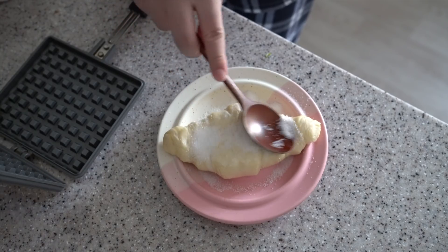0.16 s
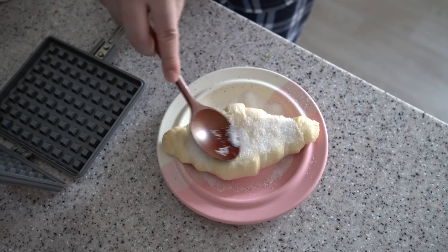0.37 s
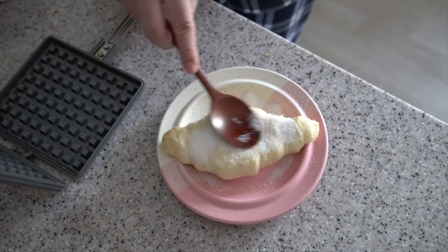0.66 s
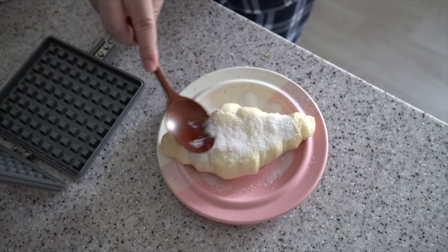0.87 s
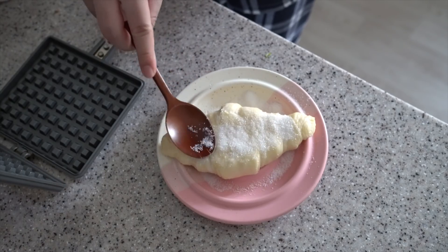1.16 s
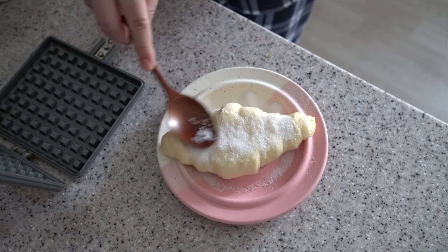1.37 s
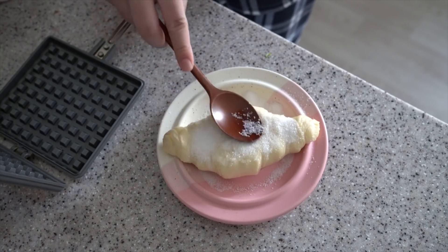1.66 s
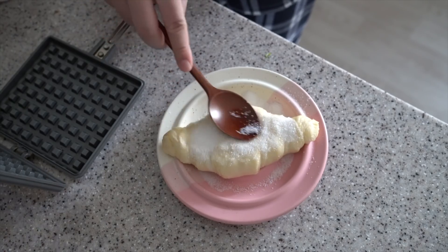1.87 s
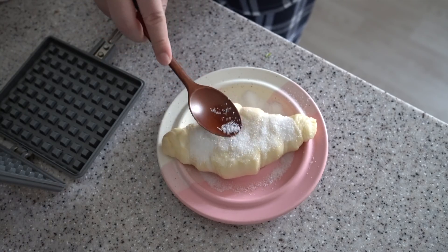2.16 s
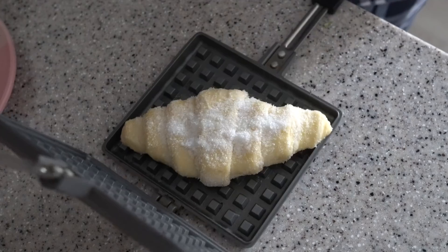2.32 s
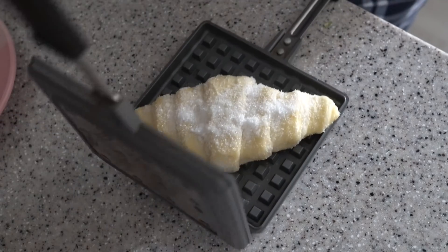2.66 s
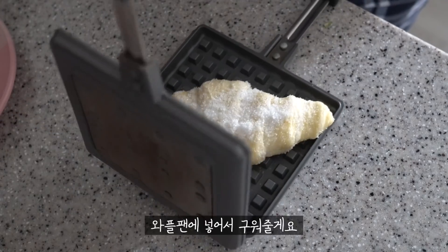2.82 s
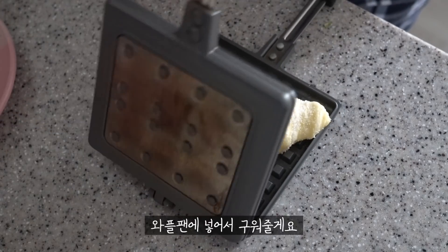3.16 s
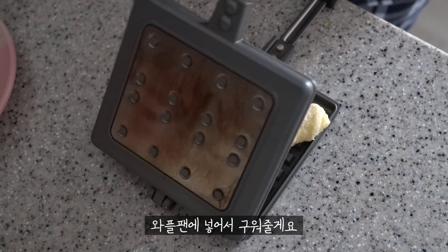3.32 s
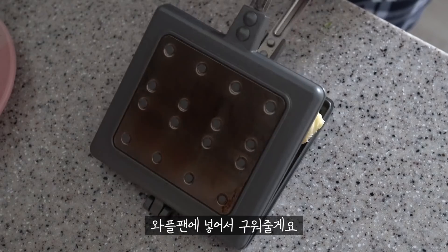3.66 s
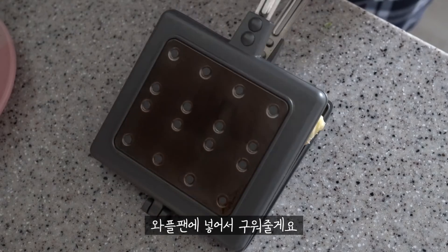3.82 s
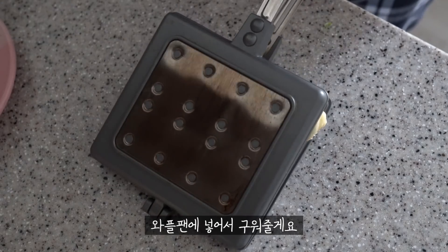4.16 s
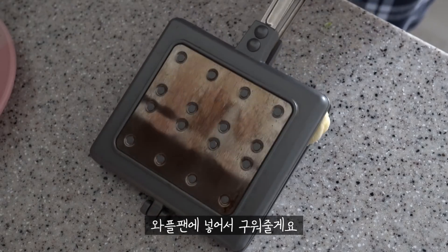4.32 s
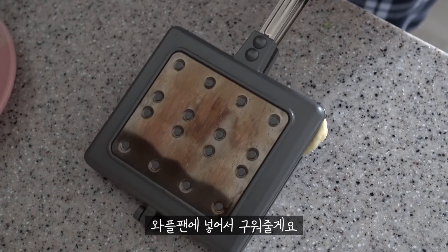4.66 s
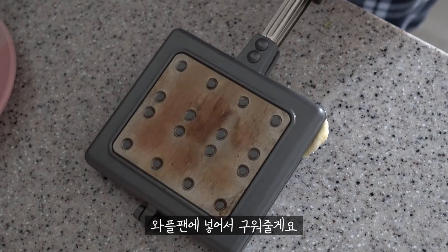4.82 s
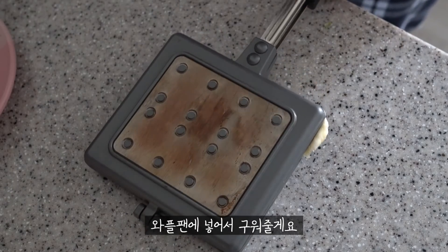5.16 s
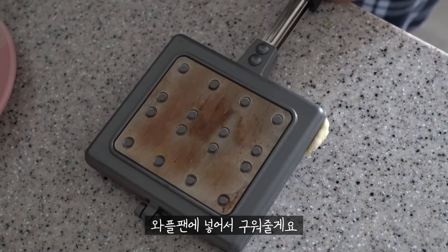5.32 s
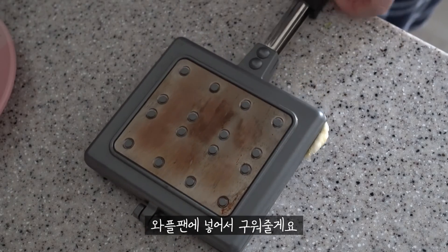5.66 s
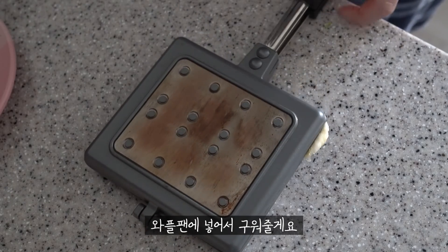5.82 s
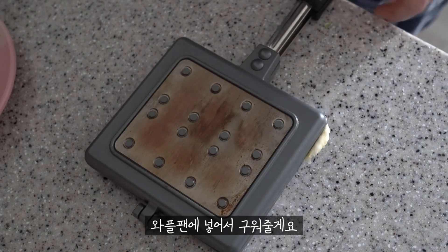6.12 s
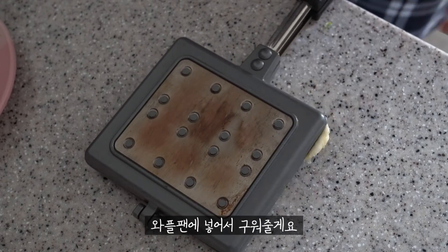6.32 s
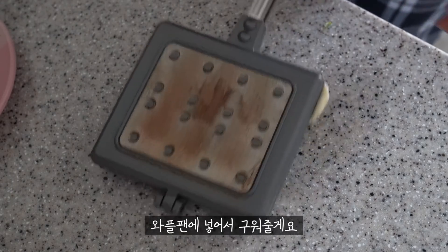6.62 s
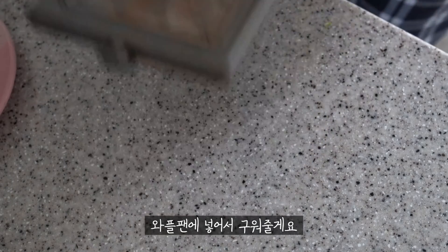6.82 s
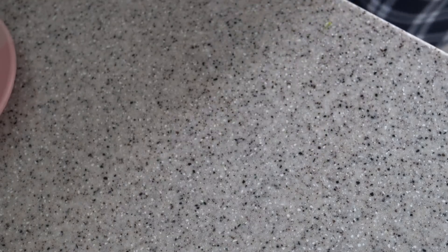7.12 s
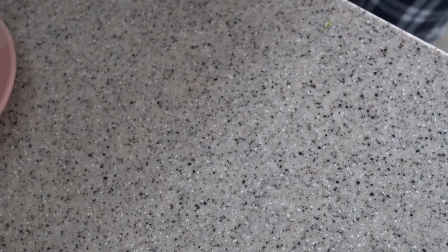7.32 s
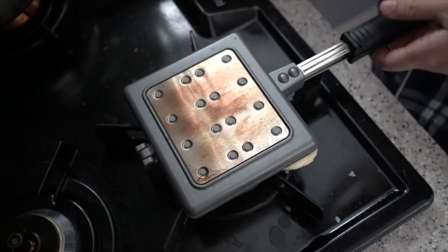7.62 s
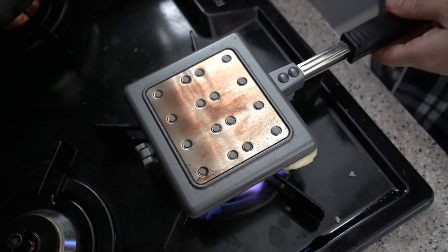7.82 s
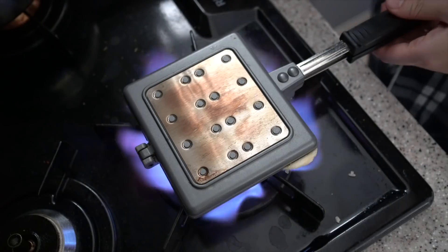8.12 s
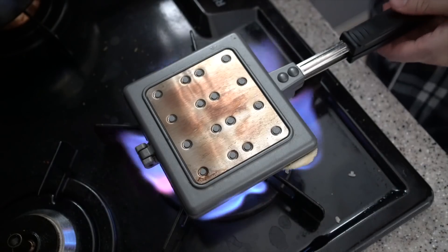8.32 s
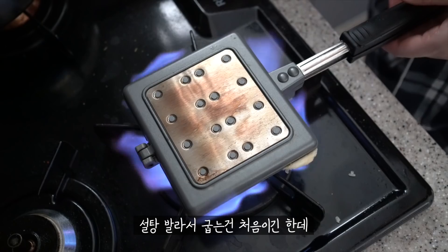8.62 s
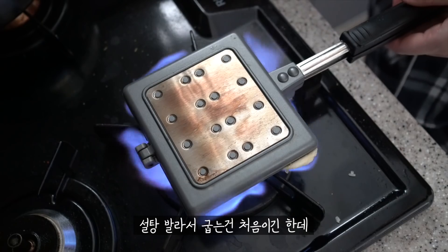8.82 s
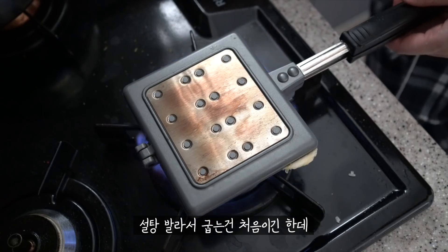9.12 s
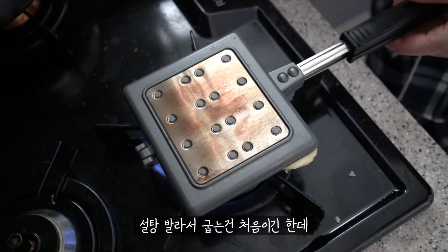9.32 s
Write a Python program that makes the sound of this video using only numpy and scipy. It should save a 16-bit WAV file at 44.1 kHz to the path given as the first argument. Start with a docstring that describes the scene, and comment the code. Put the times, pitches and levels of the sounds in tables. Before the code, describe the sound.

A close microphone in a quiet home kitchen with low room air and a short echo. From 0 to 2.3 s a wooden spoon drags sugar over pastry in crisp, grainy strokes, the longest near 0.2-0.5 and 0.65-0.9, with small soft pats between. At 2.37 a loud metal pan knock and thump, more clacks by 2.5, then dull chafing and a small squeak around 3.1. Rubbing continues from 3.6; light contacts at 4.5, a hard bright clack at 4.86, a cluster of latch clicks at 5.2-5.4, and a ringing clunk with a heavy thump at 5.6-5.7. Around 6.4-6.7 the pan slides off with a faint squeal, then tiny squeaks. At 7.45-7.75 a stove knob clunks and gas starts hissing. From 7.87 sharp igniter snaps repeat about eight per second until roughly 9.5; flame puffs alight, flutters and roars low, fading sharply around 9.

```python
"""A hinged metal waffle pan is shut, latched and lifted off a stone counter: noisy pushes ring its modes.
Before that a wooden spoon spreads and pats sugar on a pastry, as filtered random grains.
Pan halves chafe as uneven slips, narrow noises squeak and ring, and the worktop thumps in damped sines.
Then a stove knob is pushed in, gas hisses as shaped noise, the flame catches in low puffs and roars,
and the igniter keeps sparking in sharp snaps. Walls echo the spoon, pan, knob and sparks."""
import sys
import numpy as np
from scipy import signal
from scipy.io import wavfile
from scipy.ndimage import uniform_filter1d

SR = 44100
rng = np.random.default_rng(int(sys.argv[2]) if len(sys.argv) > 2 else 0)


def master_out(mix):
    """Clip the mix to full scale and print it as 16-bit PCM to the path in sys.argv[1]."""
    frames = np.transpose(np.atleast_2d(mix))
    ceiling = np.clip(frames, -1, 1)
    pcm = np.round(ceiling * 32767).astype(np.int16)
    wavfile.write(sys.argv[1], SR, pcm)


N = 418068


def gain_of(db):
    """Decibels to an amplitude factor."""
    return 10 ** (np.asarray(db) / 20)


def evened(x):
    """Scales to rms 1."""
    return x / np.sqrt(np.mean(x ** 2) + 1e-20)


def read(points, hz):
    """Reads a table on a log-frequency axis."""
    point_hz, value = np.transpose(points)
    return np.interp(np.log(hz + 1), np.log(point_hz + 1), value)


def add(mix, start_s, sound):
    """Mixes a sound in at start_s, cut at the end of the mix."""
    part = mix[round(start_s * SR):][:len(sound)]
    part += sound[:len(part)]


def coloured(x, points, size=2048):
    """Causal minimum-phase filter with the given spectrum."""
    gain_db = np.maximum(read(points, abs(np.fft.fftfreq(size, 1 / SR))), -90)
    log_gain = np.log(gain_of(gain_db))
    phase = -signal.hilbert(log_gain).imag
    taps = np.fft.ifft(np.exp(log_gain + 1j * phase)).real
    return signal.oaconvolve(x, taps[:size // 2])[:len(x)]


def noise_of(points):
    """Steady noise of rms 1, filtered finely enough for low bands."""
    return evened(coloured(rng.standard_normal(N), points, size=8192))


def grains(per_s, spread_db):
    """Tiny random slips: many small, a few large."""
    size = gain_of(spread_db * np.minimum(rng.exponential(1, N), 5)) * rng.standard_normal(N)
    return evened(size * (rng.random(N) < per_s / SR))


def wobble(window_ms, rms_db):
    """Slow chance changes of level."""
    window = max(int(window_ms * SR / 1000), 2)
    return gain_of(rms_db * evened(uniform_filter1d(rng.standard_normal(N), window)))


def strokes(rows, edge):
    """Gain over the scene from strokes that swell, hold and fade; edge is the share spent on both ramps."""
    out = np.zeros(N)
    for row in rows:
        start_s, end_s, level_db = row[:3]
        shape = signal.windows.tukey(round((end_s - start_s) * SR), min(edge, 1))
        add(out, start_s, gain_of(level_db) * shape)
    return out


def murmurs(starts_s, db, hz, width_hz, envelopes):
    """Short noises, each narrowed twice around its own pitch."""
    out = np.zeros(N)
    for start_s, level_db, f, w, shape in zip(starts_s, db, hz, width_hz, envelopes):
        peak = signal.iirpeak(f, f / w, SR)
        noise = rng.standard_normal(2 * len(shape))
        narrow = signal.lfilter(*peak, signal.lfilter(*peak, noise))[len(shape):]  # filter already settled
        add(out, start_s, gain_of(level_db) * evened(narrow * shape) * np.sqrt(np.mean(shape ** 2)))
    return out


# Room air spectrum. Each row: frequency in Hz, relative level in dB.
AIR_SPECTRUM = [(12, -44), (20, 8), (42, 5.5), (113, -6.5), (157, 1), (208, -11), (363, -4.5), (441, -13.5),
                (651, -11), (1080, -13), (1420, -14), (8690, -27.5), (15600, -33.5)]
AIR_DB = -57
QUIETER_UNTIL_S, QUIETER_DB = 2.1, -3.5


def room_air():
    """Low-heavy noise drifts slowly; its level steps up once."""
    air = gain_of(AIR_DB) * noise_of(AIR_SPECTRUM) * wobble(89, 0.27)
    return air * gain_of(np.where(np.arange(N) < QUIETER_UNTIL_S * SR, QUIETER_DB, 0))


# Crushed sugar spectrum. Each row: frequency in Hz, relative level in dB.
SUGAR_SPECTRUM = [(250, -26), (700, -8), (1080, -22), (1500, -14), (2500, -9), (3500, -9.5), (4800, -7.5),
                  (6500, -6.5), (8600, -5.5), (10200, -15), (12000, -11.5), (15600, -16)]
# Spoon drags. Each row: start in seconds, end in seconds, level in dB, brightest band in Hz.
DRAGS = [(0.089, 0.187, -56.5, 6000), (0.172, 0.486, -39, 5200), (0.647, 0.897, -41.5, 6940),
         (0.876, 0.916, -51.5, 3830), (1.013, 1.066, -60, 5000), (1.277, 1.337, -57, 6500),
         (1.427, 1.496, -42, 7400), (1.476, 1.582, -55.5, 6000), (1.664, 1.701, -45, 8000),
         (1.744, 1.79, -58.5, 5970), (1.919, 2.004, -53.5, 6960), (2.054, 2.106, -60, 6000)]
# Spoon pats. Each row: start in seconds, level at onset in dB.
PATS = [(0.0987, -44), (0.6253, -43), (1.008, -46.5), (1.2167, -43), (1.8795, -39), (2.058, -44.5),
        (2.2509, -42)]
PAT_DECAY_S = 0.011
BRIGHT_DB, BRIGHT_WIDTH = -3.5, .45  # against the drag; share of the band's pitch


def sugar():
    """Crystals crush in a dense hiss under the drag and in a short burst under each pat."""
    t = np.arange(SR // 8) / SR
    force = strokes(DRAGS, 0.52)
    for start_s, db in PATS:
        add(force, start_s, gain_of(db) * np.exp(-t / PAT_DECAY_S))
    start_s, end_s, db, hz = np.transpose(DRAGS)
    swells = [np.hanning(round(SR * length_s)) for length_s in end_s - start_s]
    bright = murmurs(start_s, db + BRIGHT_DB, hz, BRIGHT_WIDTH * hz, swells)
    crush = evened(coloured(grains(16000, 0.29), SUGAR_SPECTRUM))
    return (force * crush + bright) * wobble(13, 1.0)


# Rubbing metal spectrum. Each row: frequency in Hz, relative level in dB.
RUB_SPECTRUM = [(150, -9), (300, -19.5), (650, -11), (950, -11.5), (2200, -12.5), (5000, -6), (8800, -8.5),
                (10500, -18.5), (15600, -25)]
# Pan halves chafing, hinge working, dough squeezed. Each row: start in seconds, end in seconds,
# level in dB and treble level in dB before the layer gains, loudest band in Hz, place of the middle 0-1.
CHAFES = [(2.27, 2.353, -32, -52, 1910, 0.43), (2.389, 2.477, -34, -62, 1100, 0.2),
          (2.497, 2.626, -37, -51, 1150, 0.14), (2.598, 3.021, -55.5, -84.5, 1000, 0.38),
          (3.56, 3.988, -47.5, -63.5, 1400, 0.54), (4.068, 4.115, -48, -66, 1200, 0.47),
          (4.126, 4.504, -44, -59.5, 1500, 0.45), (4.478, 5.114, -53, -62, 1360, 0.39),
          (5.18, 5.332, -37, -63, 1420, 0.33), (5.33, 5.464, -35.5, -50, 1100, 0.22),
          (5.481, 5.564, -42, -62, 504, 0.7), (5.532, 5.62, -30.5, -53, 935, 0.52),
          (5.705, 5.918, -52, -81, 1100, 0), (6.375, 6.675, -51, -67, 1000, 0.61),
          (6.727, 6.85, -59.5, -56.5, 1700, 0.48), (7.05, 7.5, -66, -59.5, 403, 0.66)]
SWELL_SHARE = .65  # of a stroke, rising and fading together
DULL_GAIN, BAND_GAIN = 0.45, 0.38


def chafing():
    """Dense uneven slips rub dully and loudest in one band; finer grit hisses above."""
    rub = coloured(grains(7000, 2.4) * wobble(11, 1.3), RUB_SPECTRUM)
    dull = evened(signal.lfilter(*signal.butter(4, 2100, fs=SR), rub))
    grit = evened(signal.lfilter(*signal.butter(2, 2500, "high", fs=SR), rub))
    start_s, end_s, db, treble_db, hz, middle = np.transpose(CHAFES)
    bend = np.log(.5) / np.log(np.clip(middle, .05, .95))  # moves the middle of each stroke
    shapes = []
    for length_s, power in zip(end_s - start_s, bend):
        place = np.linspace(0, 1, round(SR * length_s)) ** power
        shapes.append(np.clip(np.minimum(place, 1 - place) * 2 / SWELL_SHARE, 0, 1) ** 1.5)
    low, high = np.zeros((2, N))
    for at_s, low_db, high_db, shape in zip(start_s, db, treble_db, shapes):
        add(low, at_s, gain_of(low_db) * shape)
        add(high, at_s, gain_of(high_db) * shape)
    band = murmurs(start_s, db, hz, 1.0 * hz, shapes) * wobble(5.5, 3.9)
    return (DULL_GAIN * low * dull + high * grit + BAND_GAIN * band) * wobble(37, 1.1)


def tilt_db(hz, treble_db):
    """A softer contact loses more and more of the treble; a harder one moves less bass."""
    treble = (treble_db + 7.5) * np.clip(np.log(hz / 1800) / np.log(2.4), 0, 1.5)
    bass = 0.5 * (treble_db + 19.0) * np.clip(np.log(700 / hz), 0, 1)
    return treble - bass


# Broad contact crack spectrum. Each row: frequency in Hz, relative level in dB.
CRACK_SPECTRUM = [(80, -51.5), (170, -26.5), (320, -11.5), (700, 10.5), (1500, 5.5), (4000, 7), (8000, 3),
                  (11000, -8), (15500, -7.5)]
RATTLE_DB = -18  # loose parts against the blow
HARDER = 0.51  # dB of contact time lost per dB of treble
SCATTER_DB, DETUNE = 2.5, .015  # grip and spot vary each mode's strength and pitch


def blows(rows, modes, contact_s, crack_db, rattle_s):
    """A short noisy push and lumpy rattle crack and ring the modes, most and longest near the spot struck."""
    out, t = np.zeros(N), np.arange(SR // 6) / SR
    mode_hz, mode_db, t60_s = np.transpose(modes)[:, :, None]
    crack_hz, crack_shape_db = np.transpose(CRACK_SPECTRUM)
    draws = rng.standard_normal((len(rows), 3, len(t)))
    for (start_s, peak_db, treble_db, spot_hz), draw in zip(rows, draws):
        touch_s = contact_s * gain_of(min(-HARDER * (treble_db + 14), 1))
        lumps = gain_of(RATTLE_DB + 4 * evened(uniform_filter1d(draw[1], size=120)))
        fade = np.exp(-t / touch_s) + lumps * np.exp(-t / rattle_s)
        push = draw[0] * (1 - np.exp(-3 * t / touch_s)) * fade

        scatter, detune = draw[2, :2 * len(modes)].reshape(2, -1, 1)
        hz = mode_hz * (1 + DETUNE * detune)
        near = np.exp(-(np.log(hz / spot_hz) / .25) ** 2)
        ring_db = mode_db + 8 * near + SCATTER_DB * scatter + tilt_db(hz, treble_db)
        decay_db = -60 * t / (t60_s * (.5 + .45 * near))
        ring = (gain_of(ring_db + decay_db) * np.sin(2 * np.pi * hz * t)).sum(0)
        sound = signal.fftconvolve(push, ring)

        near_db = 9 * np.exp(-(np.log(crack_hz / spot_hz) / 0.55) ** 2)
        spectrum_db = crack_shape_db + tilt_db(crack_hz, treble_db) + near_db
        crack = coloured(push, np.transpose([crack_hz, spectrum_db]))
        add(sound, 0, gain_of(crack_db) * crack)
        add(out, start_s, gain_of(peak_db) * sound / abs(sound).max())
    return out


# Blows on the pan. Each row: start in seconds, peak in dB before the low cut,
# treble against the whole in dB, best-ringing spot in Hz.
PAN_KNOCKS = [(2.277, -19.5, -34.5, 314), (2.298, -16, -37.5, 295), (2.369, 0, -22, 1256),
              (2.375, -6, -24, 666), (2.387, -18, -16.5, 886), (2.409, -24, -19.5, 4380),
              (2.417, -27, 4, 4400), (2.474, -19.5, -16, 5300), (2.478, -7.5, -19, 1184),
              (2.483, -7.5, -13.5, 1440), (2.501, -20, -12, 3640), (2.517, -22, -12, 1100),
              (2.694, -41.5, -22, 5300), (2.844, -40.5, -13, 317), (3.302, -44.5, -11.5, 2960),
              (4.504, -36.5, -27.5, 1360), (4.544, -23.5, -2.5, 1720), (4.556, -26.5, -5.5, 7000),
              (4.559, -24, -26.5, 1386), (4.645, -40, -31.5, 1390), (4.674, -27.5, -38.5, 1070),
              (4.699, -28.5, -4.5, 1080), (4.857, -3, -4, 4520), (4.863, -10.5, -1.5, 2500),
              (4.985, -12.5, -8, 5340), (5.199, -44.5, 2, 5300), (5.209, -34.5, -17, 3640),
              (5.236, -38, -16, 2490), (5.27, -27, -14, 1850), (5.298, -21, -17.5, 990),
              (5.3245, -6, -5, 8500), (5.331, -14, -7, 7500), (5.333, -17, -27, 1670),
              (5.339, -32, 1, 9950), (5.373, -17, -5.5, 262), (5.406, -17, -6.5, 1250),
              (5.572, -14, -17.5, 1750), (5.582, -12, -6, 1720), (5.702, -8.5, -38, 1100),
              (6.557, -30, -9.5, 1470), (7.099, -39.5, -6, 4400), ]
# Pan and handle modes. Each row: frequency in Hz, relative level in dB, t60 in seconds before spot scaling.
PAN_MODES = [(291, -6, .06), (375, -8, .07), (673, -3, .06), (890, -2, .04), (1044, 0, .05),
             (1184, -5, .04), (1390, -3, .04), (1610, -5, .05), (1780, -5, .05), (2490, -6, .03),
             (3040, -7, .04), (3640, -7, .04), (4400, -9, .04), (5300, -8, .05), (7500, -6, .03),
             (9950, -13, .14), (13400, -15, .2)]


def pan_knocks():
    """Brief metal contacts ring the pan; a small pan radiates little bass."""
    pan = blows(PAN_KNOCKS, PAN_MODES, contact_s=0.0022, crack_db=23.94, rattle_s=0.016)
    return signal.lfilter(*signal.butter(3, 210, "high", fs=SR), pan)


# Thumps through counter and stove. Each row: start in seconds, level in dB, pitch in Hz.
THUMPS = [(2.37, -31, 90), (2.654, -27, 274), (2.991, -43.5, 169), (3.079, -39, 209), (3.783, -32, 290),
          (3.799, -51, 67.8), (4.047, -53, 53.6), (4.241, -57, 127), (4.863, -38, 60.6),
          (5.22, -35.5, 50.7), (5.378, -45, 61.4), (5.702, -19.5, 156), (5.709, -35, 59.3),
          (6.377, -41, 75), (7.46, -44, 45), (7.749, -43, 44.7), (8.114, -21.5, 134.4)]
THUMP_T60_S, THUMP_DAMPING = 0.23, 1.5  # t60 at 100 Hz; it shortens as this power of the pitch
RUMBLE_DB = -4.0  # against the swing


def thumps():
    """The worktop shudders: a damped low swing, with loose rumble riding on it."""
    start_s, db, hz = np.transpose(THUMPS)
    t60_s = THUMP_T60_S * (100 / hz) ** THUMP_DAMPING
    t, out = np.arange(SR // 2) / SR, np.zeros(N)
    fades = (1 - np.exp(-t * 2.0 * hz[:, None])) * gain_of(-60 * t / t60_s[:, None])
    for at_s, level_db, f, fade in zip(start_s, db, hz, fades):
        add(out, at_s, gain_of(level_db) * fade * np.sin(2 * np.pi * f * t))
    return out + gain_of(RUMBLE_DB) * murmurs(start_s, db, hz, 0.44 * hz, fades)


# Squeaks and rings of hinge, handle and struck pan. Each row: start in seconds, level in dB, pitch in Hz.
SQUEAKS_AND_RINGS = [(2.891, -50, 1480), (3.116, -40, 1730), (3.33, -57.5, 4300), (4.82, -47, 1680),
                     (5.583, -28.5, 1670), (5.855, -57, 4260), (6.06, -53.5, 1470), (6.39, -55, 2630),
                     (6.42, -52.5, 2970), (6.294, -57, 1780), (6.30, -57.5, 4000), (6.873, -52.5, 2740),
                     (6.887, -47, 1730), (6.978, -48, 2140), (7.172, -43.5, 1435)]
RISE_S, FADE_S, BAND_WIDTH = .002, .021, .14  # width as a share of the pitch
TICK_DB, TICK_FADE_S = -5, 0.0068  # level against the narrow band


def squeaks_and_rings():
    """Short narrow-band squeaks and rings, each with a wider, lower tick at its start."""
    start_s, db, hz = np.transpose(SQUEAKS_AND_RINGS)
    t = np.arange(SR // 4) / SR
    rise = 1 - np.exp(-t / RISE_S)
    tick_shapes = [rise * np.exp(-t / TICK_FADE_S)] * len(hz)
    band_shapes = [rise * np.exp(-t / FADE_S)] * len(hz)
    ticks = murmurs(start_s, db + TICK_DB, 0.59 * hz, 1.56 * hz, tick_shapes)
    return ticks + murmurs(start_s, db, hz, BAND_WIDTH * hz, band_shapes)


# Slide bands. Each row: frequency in Hz, level in dB.
SQUEAL_BANDS = [(1500, -54), (2820, -57.5), (5130, -65.5)]
SQUEAL_START_S, SQUEAL_END_S = 6.46, 6.67


def squeal():
    """The pan slides off the stone and holds three bands of noise at once."""
    hz, db = np.transpose(SQUEAL_BANDS)
    shape = signal.windows.tukey(round((SQUEAL_END_S - SQUEAL_START_S) * SR), .4)
    return murmurs([SQUEAL_START_S] * len(hz), db, hz, 0.28 * hz, [shape] * len(hz))


# Blows on knob and grate. Each row: start in seconds, peak in dB, treble against the whole in dB,
# best-ringing spot in Hz.
KNOB_KNOCKS = [(7.452, -21.5, -60, 560), (7.462, -24, -20, 680), (7.505, -9.5, -18, 1620),
               (7.514, -28, -24, 1730), (7.632, -15.5, -11.5, 1730), (7.655, -22, -15, 1100),
               (7.695, -16.5, -11, 383), (7.741, -13.5, -5.5, 580), (7.747, -15.5, -41, 440),
               (8.999, -37.5, -16, 910)]
# Stove modes. Each row: frequency in Hz, relative level in dB, t60 in seconds before spot scaling.
STOVE_MODES = [(144, -13, 0.13), (349, 0, 0.12), (554, 7, 0.047), (869, 5, 0.093), (958, 2, 0.061),
               (1660, -14, 0.048)]


def knob_knocks():
    """The padded knob makes slower contacts that ring the stove."""
    return blows(KNOB_KNOCKS, STOVE_MODES, contact_s=0.0079, crack_db=26.6, rattle_s=0.018)


# Gas valve. Each row: time in seconds, flow as hiss level in dB.
GAS_FLOW = [(7.621, -54), (7.7, -47), (8.13, -46), (8.7, -47), (9.0, -53), (9.15, -62.5), (9.48, -60)]
# Gas hiss spectrum. Each row: frequency in Hz, relative level in dB.
HISS_SPECTRUM = [(500, -38), (1100, 0), (2000, 1), (4000, -3), (8000, -7), (15600, -25)]
# Burner cap whistles. Each row: pitch in Hz, width in Hz, level against the hiss in dB.
JETS = [(1050, 31, -4), (2652, 26, -8.5), (3310, 49, -11)]
# Flame roar spectrum. Each row: frequency in Hz, relative level in dB.
ROAR_SPECTRUM = [(24, -84), (40, -10.5), (130, 0), (211, -9), (616, -12), (1050, -10), (1590, -25.5),
                 (2500, -26), (3250, -63), (5500, -120)]
# Pockets of gathered gas catching. Each row: start in seconds, end in seconds, level in dB.
PUFFS = [(7.87, 7.94, -26.5), (7.955, 8.07, -27.5), (8.1, 8.145, -30)]
# Puff spectrum. Each row: frequency in Hz, relative level in dB.
PUFF_SPECTRUM = [(50, -5), (130, -4), (330, -5.5), (900, -7.5), (1500, -14), (2500, -22.5), (6000, -72)]
FULL_FLOW_DB, ROAR_DB, ROAR_PER_DB = -46.5, -40.5, 2  # roar level at full flow; dB of roar per dB of flow


def burner():
    """Gas hisses and faintly whistles through the jets; the flame catches, roars and flutters under the pan."""
    gas = rng.standard_normal(N)
    flow_db = np.interp(np.arange(N) / SR, *np.transpose(GAS_FLOW), left=-200)
    whistles = np.zeros(N)
    for hz, width_hz, db in JETS:
        peak = signal.iirpeak(hz, hz / width_hz, SR)
        whistles += gain_of(db) * evened(signal.lfilter(*peak, gas))
    hiss = gain_of(flow_db) * (evened(coloured(gas, HISS_SPECTRUM)) + whistles) * wobble(9.8, 0.63)
    flame = gain_of(ROAR_DB + ROAR_PER_DB * (flow_db - FULL_FLOW_DB))
    roar = flame * noise_of(ROAR_SPECTRUM) * wobble(25, 2.2)
    puffs = strokes(PUFFS, 0.38) * noise_of(PUFF_SPECTRUM) * wobble(8.6, 0.81)
    return hiss + roar + puffs


# Snap spectrum. Each row: frequency in Hz, relative level in dB.
SPARK_SPECTRUM = [(180, -92), (300, -30.5), (884, -23.5), (1140, -23.5), (1470, -15), (2650, -21.5),
                  (3030, -10.5), (4100, -10.5), (4540, -9.5), (6360, -12), (7290, -4), (11100, -13),
                  (14600, -7), (15300, -13.5), (16900, -23)]
FIRST_SPARK_S, SPARK_GAP_S, GAP_GROWTH_S = 7.8683, .12137, .000146  # waits lengthen steadily
SPARK_DB, SPARK_SAG_DB, SPARK_SPREAD_DB = 10.5, -0.26, .5  # first snap's energy, change per spark, chance
UNLIKE = .9  # scatter that differs each time, against the shared scatter


def igniter():
    """Each spark is one sharp snap scattered off the same nearby metal, with a share that differs each time."""
    out, t = np.zeros(N), np.arange(2048) / SR
    near_echo = 0.22 * np.exp(-t / 0.0018)
    late_echo = 0.033 * (t > .0032) * np.exp(-(t - .0032) / 0.0047)
    long_echo = 0.066 * np.exp(-t / 0.0075)
    echoes = near_echo + late_echo + long_echo
    alike = rng.standard_normal(len(t))
    for k, draw in enumerate(rng.standard_normal((14, len(t)))):
        start_s = FIRST_SPARK_S + k * (SPARK_GAP_S + k * GAP_GROWTH_S / 2)
        db = SPARK_DB + k * SPARK_SAG_DB + SPARK_SPREAD_DB * draw[-1]
        snap = coloured((t == 0) + (alike + UNLIKE * draw) * echoes, SPARK_SPECTRUM)
        add(out, start_s, gain_of(db) * snap / np.linalg.norm(snap))
    return out


# Kitchen reverberation. Each row: frequency in Hz, t60 in seconds.
KITCHEN_T60 = [(200, 0.5), (1000, 0.34), (4000, 0.16), (9000, 0.22), (15000, 0.14)]


def kitchen(x):
    """Walls answer with sparse taps of random sign, each band dying at its own speed."""
    taps = np.zeros(SR // 2)
    at = np.arange(300, len(taps) - 20, 20)
    taps[at + rng.integers(0, 20, len(at))] = rng.choice([-1., 1.], len(at))
    hz, t, bands = signal.stft(taps, SR, nperseg=256)
    decay = gain_of(-60 * t / read(KITCHEN_T60, hz)[:, None])
    tail = signal.istft(bands * decay, SR, nperseg=256)[1]
    return signal.oaconvolve(x, tail / np.linalg.norm(tail))[:N]


def scene():
    """Counter work, then the stove, over the quiet air of the room."""
    spoon, pan, knob, sparks = sugar(), pan_knocks(), knob_knocks(), igniter()
    to_walls = gain_of(-10.0) * spoon + gain_of(-11.5) * pan + gain_of(-13.5) * (knob + sparks)
    direct = spoon + pan + knob + sparks
    narrow = squeaks_and_rings() + squeal()
    return (direct + kitchen(to_walls) + chafing() + narrow + thumps() + burner() + room_air())[None]


def record(dry):
    """Peaks are held within 0.9 of full scale; then a low-pass limits the band."""
    held = np.clip(dry, -.9, .9)
    low_pass = signal.firwin(121, 15950, window=("kaiser", 9), fs=SR)  # edge in Hz
    return signal.oaconvolve(held, low_pass[None], "same")


dry = scene()
out = record(dry)
master_out(out)
```